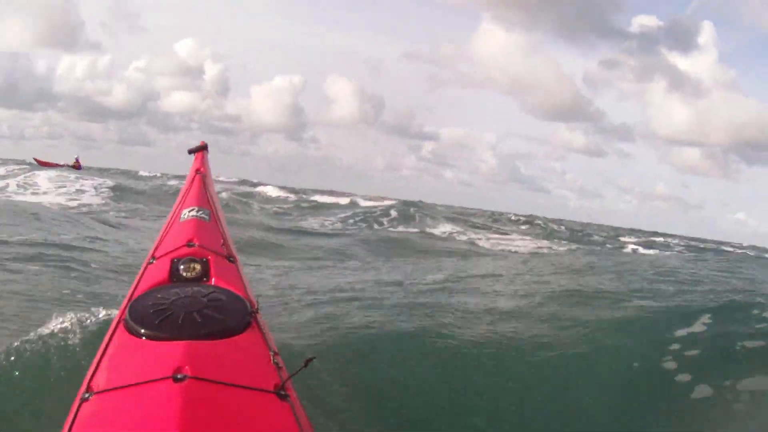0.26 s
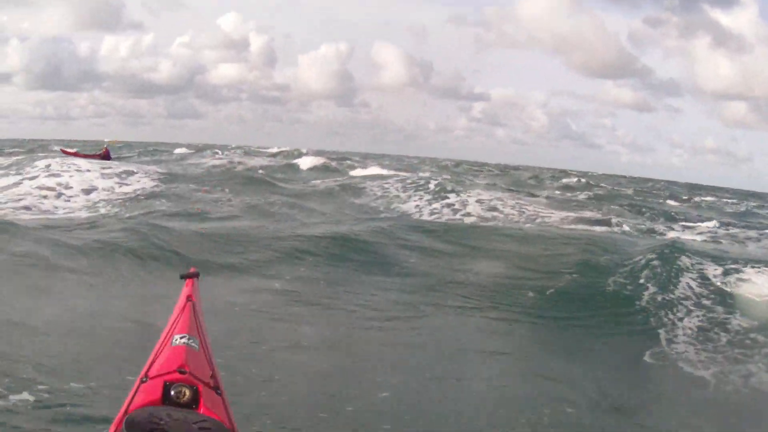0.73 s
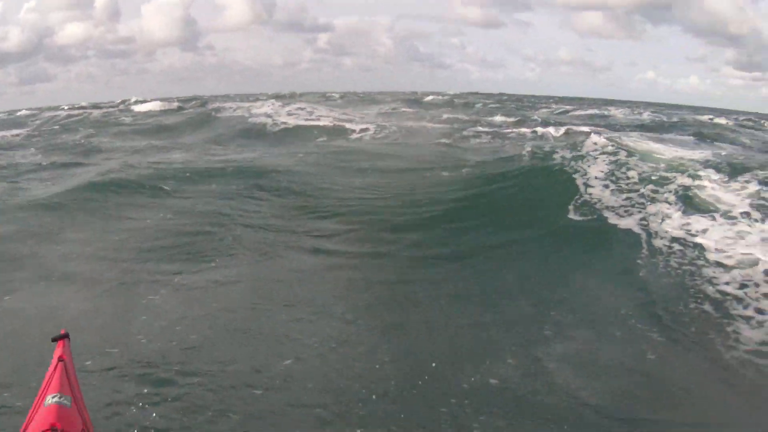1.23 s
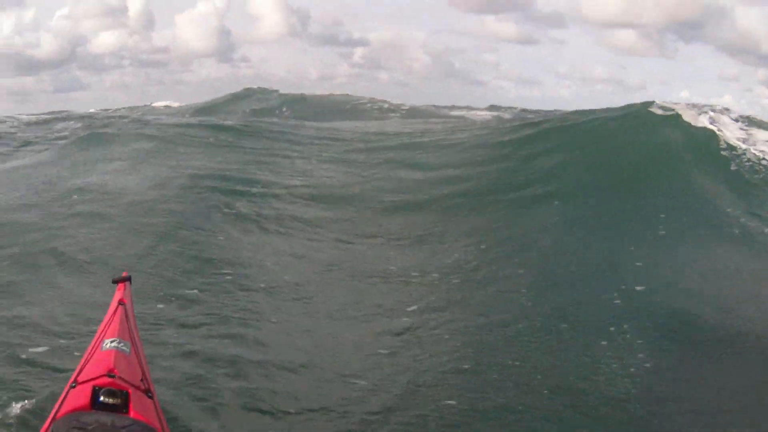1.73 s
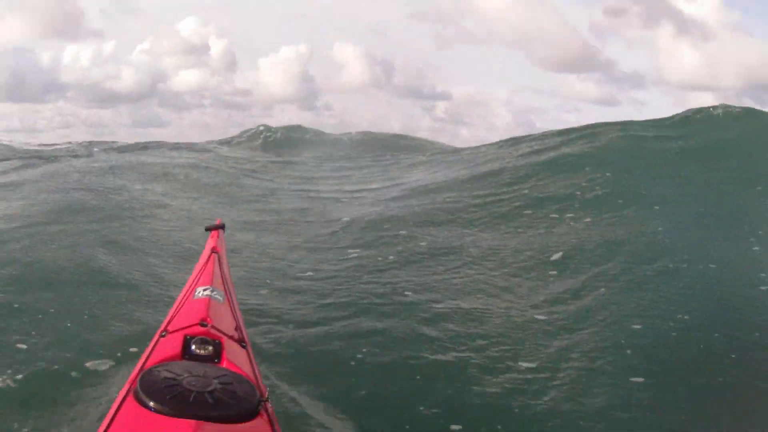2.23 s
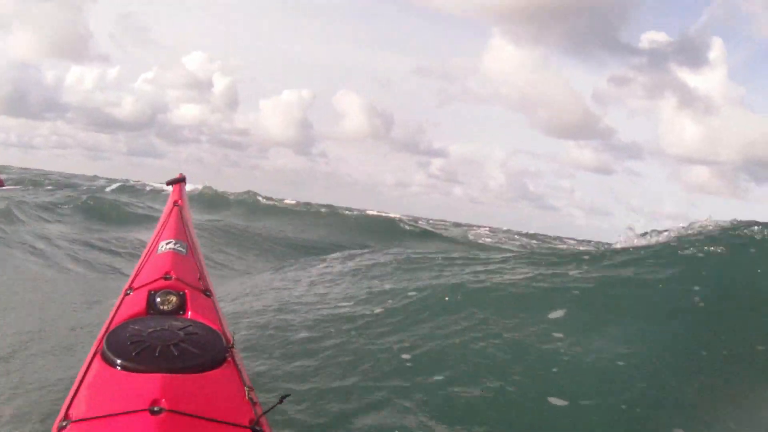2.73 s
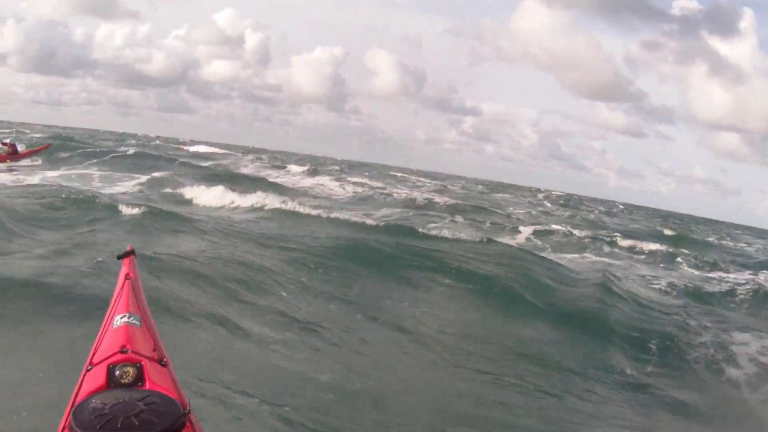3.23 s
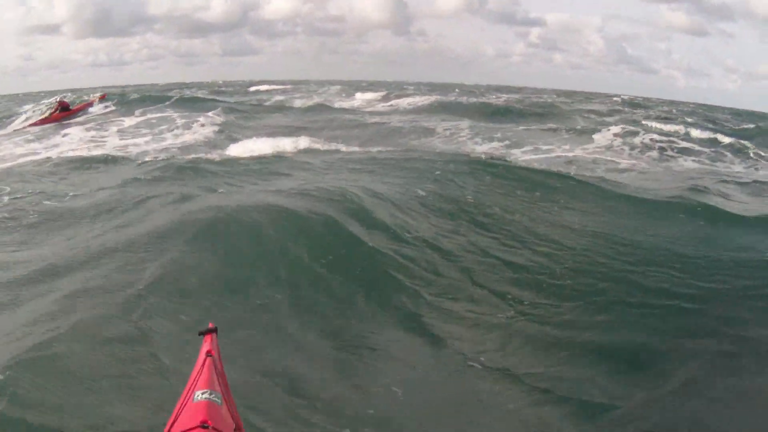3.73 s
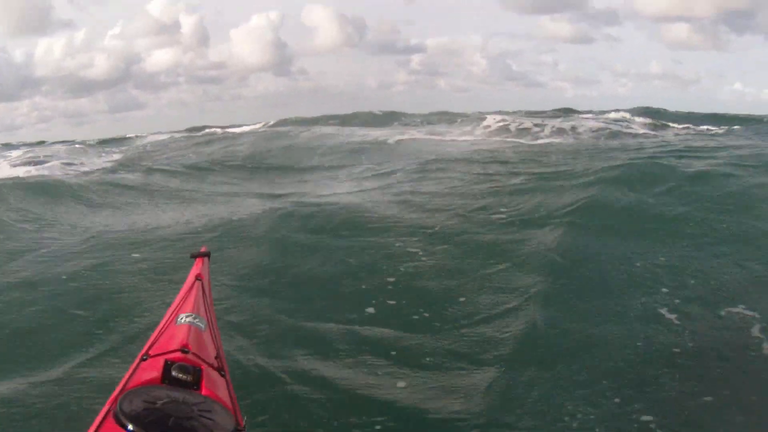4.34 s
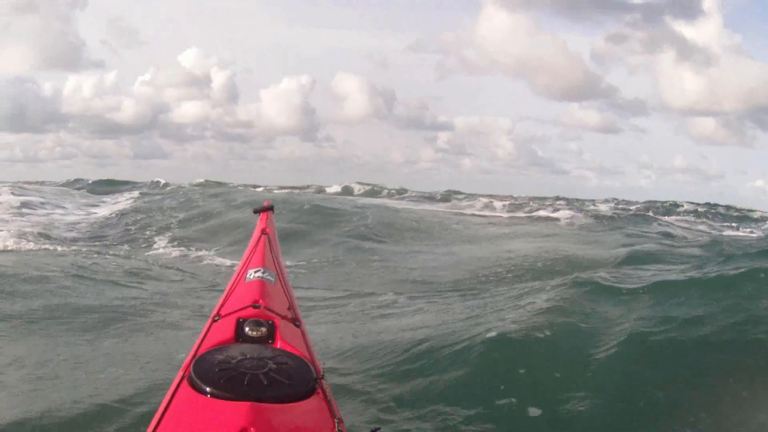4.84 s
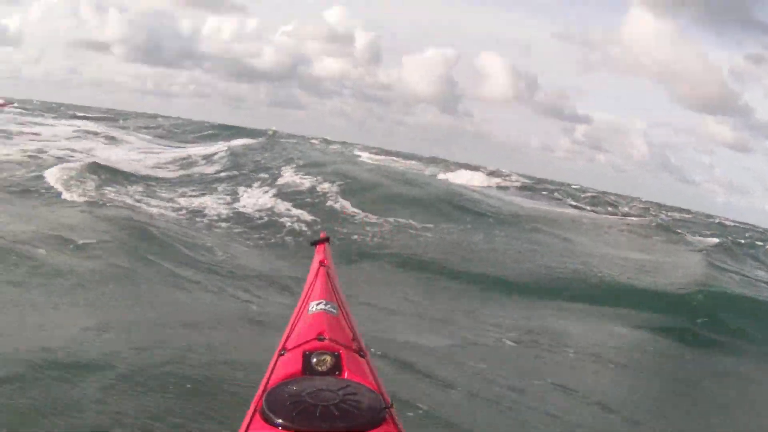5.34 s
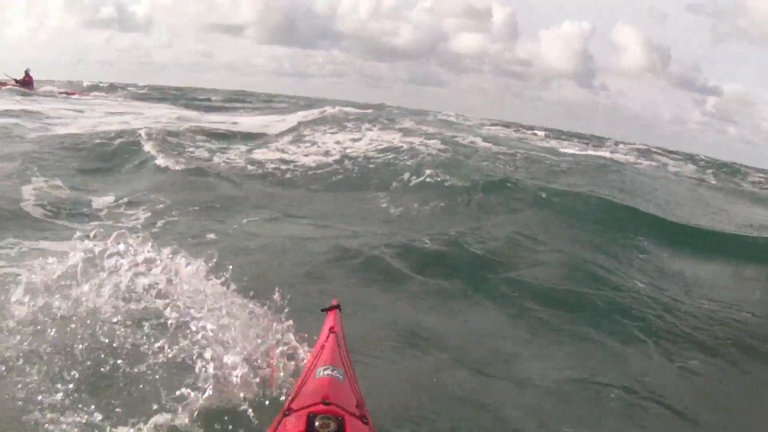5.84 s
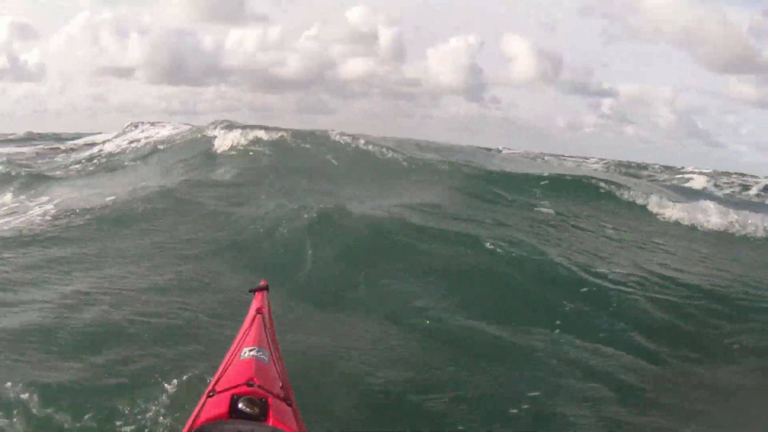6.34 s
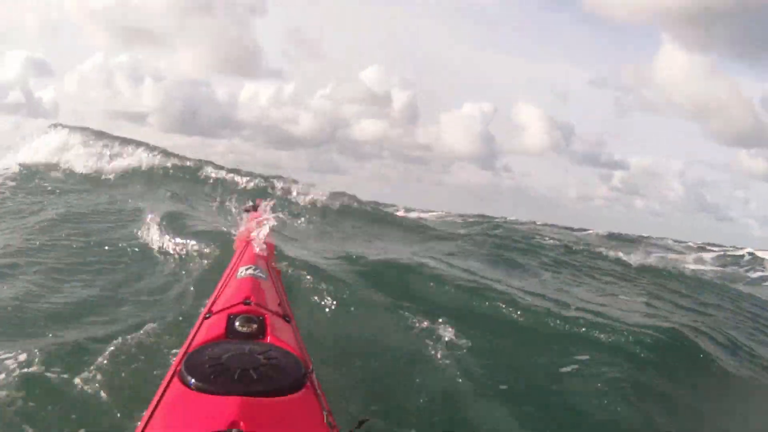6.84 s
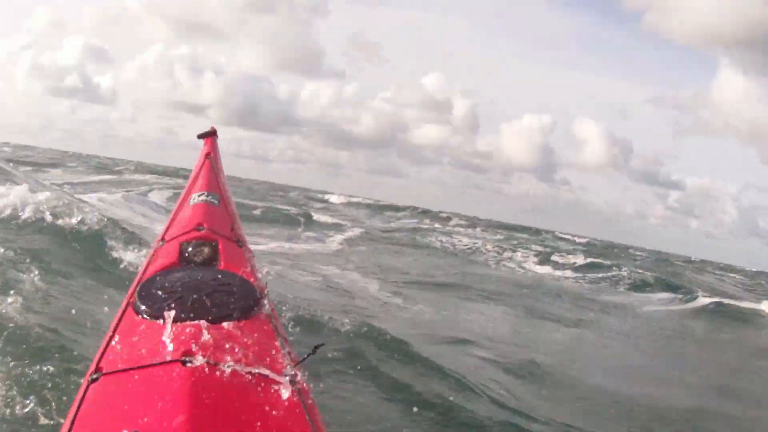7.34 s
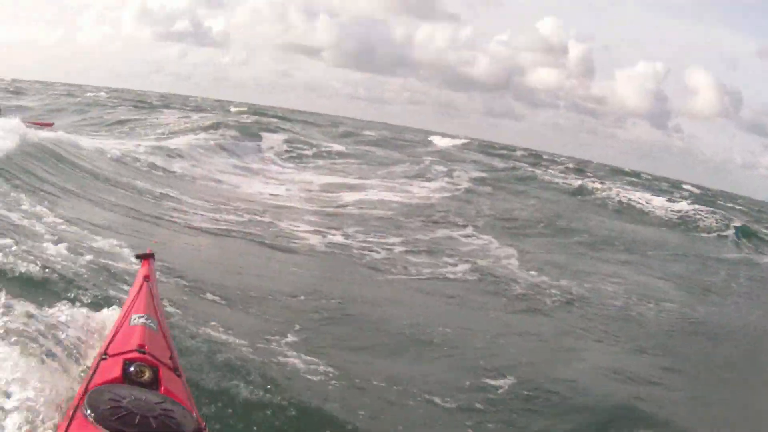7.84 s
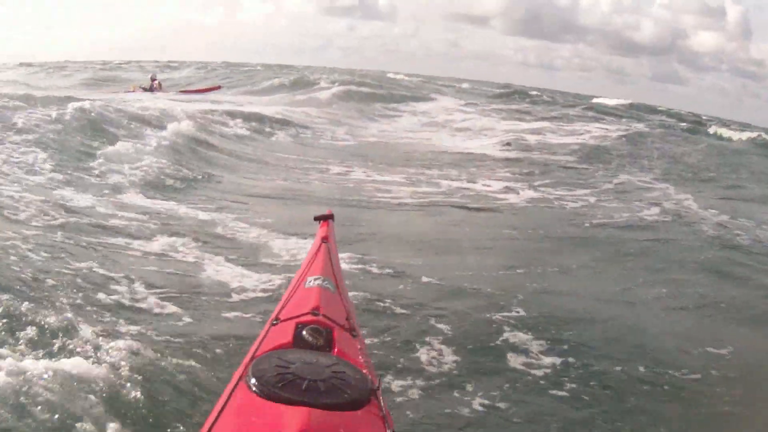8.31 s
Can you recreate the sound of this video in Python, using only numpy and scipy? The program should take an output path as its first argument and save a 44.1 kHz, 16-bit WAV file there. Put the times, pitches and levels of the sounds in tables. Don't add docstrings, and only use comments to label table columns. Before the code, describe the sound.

Outdoors on open rough water, a sealed microphone rides a small boat. Dull gusty wind rumbles and flutters throughout over bubbling hull wash. Small drops and sharp slaps strike the casing early, the water eases, then a dense splash crashes over it. After a calmer stretch, more spray arrives, then low gulping knocks, and the foam swells again with wind puffs at the end.

```python
import sys
import numpy as np
from scipy import signal
from scipy.fft import rfft, irfft, next_fast_len
from scipy.io import wavfile
from scipy.ndimage import uniform_filter1d, map_coordinates

SR = 44100
rng = np.random.default_rng(int(sys.argv[2]) if len(sys.argv) > 2 else 0)


def magnitude_from_level(level_db):
    exponent = np.asarray(level_db, float) / 20
    return 10 ** exponent


def wav_out(sig):
    wavfile.write(sys.argv[1], SR, np.round(np.clip(np.atleast_2d(sig).T, -1, 1) * 32767).astype(np.int16))


N = 377937


def unit(x):
    return x / np.sqrt(np.mean(x ** 2) + 1e-20)


def curves(rows):
    s, *columns = np.transpose(rows)
    return [np.interp(np.arange(N) / SR, s, column) for column in columns]


def swells(rows):
    t = np.arange(0, N / SR, .005)
    total_db = sum(db * np.exp(-((t - s) / width) ** 2) for s, db, width in rows)
    return np.interp(np.arange(N) / SR, t, total_db)


def wobble(rate):
    knots = rng.standard_normal(int(N * rate / SR) + 4)
    return map_coordinates(knots, [np.arange(N) * rate / SR])


def bursts(rows):
    env, t = np.zeros(N + SR), np.arange(SR // 3) / SR
    for s, db, rise, t60 in rows:
        env[round(s * SR):][:len(t)] += magnitude_from_level(db - 60 * t / max(t60, .002)) * (1 - np.exp(-t / rise))
    return env[:N]


def halves(x, hz):
    filters = [signal.butter(4, hz, kind, fs=SR, output="sos") for kind in ("low", "high")]
    return [signal.sosfilt(sos, x) for sos in filters]


def coloured(x, points):
    m = 2 * next_fast_len(N // 2 + 4096)
    hz, db = np.transpose(points)
    gain_db = np.interp(np.log(np.fft.rfftfreq(m, 1 / SR) + 1), np.log(hz + 1), db)
    cepstrum = irfft(np.log(magnitude_from_level(gain_db) + 1e-6), m)
    cepstrum[1:m // 2] *= 2
    cepstrum[m // 2 + 1:] = 0
    return irfft(rfft(x, m) * np.exp(rfft(cepstrum)), m)[..., :N]


def patchy(depth_db, bins, frames):
    z = signal.stft(rng.standard_normal(N), nperseg=256)[2]
    field = uniform_filter1d(rng.standard_normal(z.shape), bins, 0)
    field = uniform_filter1d(field, frames, 1)
    return unit(signal.istft(z * magnitude_from_level(depth_db * unit(field)), nperseg=256)[1][:N])


def bubbles(count, lo_hz, hi_hz, cycles, spread_db, size):
    when, pitch = rng.random((2, count, 1))
    hz, t = lo_hz * (hi_hz / lo_hz) ** pitch, np.arange(size) / SR
    age = t * hz / cycles
    bigness = np.minimum(rng.exponential(size=(count, 1)), 3.5)
    swell = magnitude_from_level(spread_db * bigness) * np.sqrt(hz) * age * np.exp(-3 * age)
    pop = swell * np.sin(2 * np.pi * hz * t * (1 + 0.13 * age))
    at = (when * N).astype(int) + np.arange(size)
    return unit(np.bincount(at.ravel(), pop.ravel(), N + size)[:N])


# (f/Hz, level/dB per Hz)
BUFFET_SPECTRUM = [(12, -54), (20, -31), (38, -32), (75, -23), (139, -8.5), (244, 1), (280, -1.5), (444, 0),
                   (670, -19), (960, -24), (1200, -36.5), (1560, -54), (2640, -120)]
# (t/s, level/dB)
GUSTS = [(0, -24), (.6, -28.5), (.9, -25), (1.2, -21.5), (1.5, -18), (1.85, -22), (2.06, -22), (2.25, -26),
         (2.75, -29.5), (3.55, -25), (4.15, -22), (4.6, -24), (5.2, -27.5), (5.9, -25), (6.3, -28.5),
         (6.55, -20.5), (7.0, -31), (8.57, -34)]
# (t/s, gain/dB, extra gain of the big eddies/dB, half width/s)
PUFFS = [(.42, 1.5, 3.5, 0.037), (1.08, -1.5, 6, 0.15), (3.1, 0.5, 8.5, 0.15), (3.42, 1, 4, .04),
         (3.62, -6, -9, 0.05), (4.25, 2, 3, 0.11), (4.68, 1.5, 2, 0.092), (5.4, 2, 4, .05),
         (.05, -1, 0, 0.1), (1.75, 1, 1, .06), (6.68, 1.5, -3, 0.09), (7.47, 3.5, 2, 0.044),
         (5.7, -1.5, -7, 0.17), (7.68, 6, -13, 0.083), (8.02, 7, 3.5, 0.32), (8.48, 3.5, 12.5, 0.13)]
DEEP_DB, DEEP_FOLLOWS = -41, 1.86
BODY_HZ, BODY_GROWS = 330, .22


def wind():
    gust_db, = curves(GUSTS)
    gust_db = gust_db + swells([(s, db, width) for s, db, _, width in PUFFS])
    swing_db = gust_db - gust_db.mean()
    deep_db = DEEP_DB + DEEP_FOLLOWS * swing_db + 2.3 * wobble(15)
    deep_db = deep_db + swells([(s, db, width) for s, _, db, width in PUFFS])
    lumps = magnitude_from_level(0.2 * wobble(11) + 1.44 * wobble(40))

    deep, buffet = halves(coloured(patchy(1.1, bins=2, frames=12), BUFFET_SPECTRUM), hz=150)
    low, high = halves(buffet, BODY_HZ)
    buffet = 0.66 * (magnitude_from_level(BODY_GROWS * swing_db) * low + high) / high.std()
    sway, deep = halves(deep, hz=40)
    sway_db = -75 + 2.5 * wobble(3.4)
    return magnitude_from_level(gust_db - 0.99) * lumps * buffet + magnitude_from_level(deep_db) * unit(deep) + magnitude_from_level(sway_db) * unit(sway)


# (f/Hz, level/dB per Hz)
WALL_RESPONSE = [(240, -21), (400, -6), (438, 4), (476, -2.5), (879, -10.5), (1510, -11.5), (1780, -7),
                 (2010, 1), (2100, -2), (2650, -38.5), (2900, -39), (3770, -53), (6380, -120)]
# (t/s, gain/dB, half width/s)
SURGES = [(.22, 1.5, 0.23), (.62, -1, 0.15), (1.65, -2, 0.13), (2.15, 2, 0.27), (3.1, -3.5, 0.23),
          (4.55, 2, 0.12), (5.18, -1.5, .1), (5.6, 1.5, 0.32), (6.05, -1.5, 0.16), (6.8, 0, 0.16),
          (7.98, 2.5, 0.12), (8.4, 0.5, 0.26)]
# (t/s, level on the port/dB, level on the wall/dB, rise/s, t60/s)
SHEETS = [(.521, -30.5, -21, 0.0046, 0.11), (.7, -39, -26, 0.049, 0.35), (1.409, -33, -24, 0.023, 0.18),
          (3.237, -28.5, -20.5, 0.032, 0.47), (3.404, -31, -22.5, 0.0072, 0.33),
          (3.496, -27.5, -20.5, 0.012, 0.56), (3.614, -26.5, -13.5, 0.017, 0.17),
          (6.22, -29.5, -34, .05, 0.46), (7.451, -51, -44, .002, 0.045), (7.868, -35.5, -27, 0.0087, 0.42),
          (8.05, -72, -41, .04, 0.9), (8.26, -34, -26, 0.062, .42)]
WASH_DB, WASH_FOLLOWS = -32.5, 0.72


def wash(swing_db):
    level_db = WASH_DB + WASH_FOLLOWS * swing_db + swells(SURGES)
    foam = patchy(0.99, bins=4, frames=10) * magnitude_from_level(0.16 * wobble(16))
    froth = foam + 0.24 * bubbles(count=5000, lo_hz=508.4, hi_hz=2631, cycles=7.5, spread_db=3, size=500)
    sheets = bursts([(s, wall_db, rise, t60) for s, _, wall_db, rise, t60 in SHEETS])
    return (magnitude_from_level(level_db) + sheets) * unit(coloured(froth, WALL_RESPONSE))


# (f/Hz, level/dB per Hz)
PORT_RESPONSE = [(1470, -36), (2500, -6), (2720, -13), (3730, 2), (4260, -8), (4850, 3.5), (5580, -7),
                 (6560, 0), (7310, -8), (9070, -24.5), (10000, -21.5), (11600, -4), (13500, -10.5),
                 (15100, -0.5), (15800, -8)]
NOTCH_HZ = 9350


def through_port(x):
    both = coloured(np.array([x, rng.standard_normal(N)]), PORT_RESPONSE)
    return [heard / reference.std() for heard, reference in halves(both, NOTCH_HZ)]


# (t/s, gain/dB, half width/s)
VEILS = [
    (.36, -4, 0.32),
    (3.04, 5, .08),
    (3.3, -7, .06),
    (4.95, 1, .08),
    (5.8, 10, 0.088),
    (6.05, 2, 0.098),
    (7.25, 7.5, 0.34),
    (7.6, -1.5, .06),
]
# (t/s, peak level/dB, level above the notch re peak/dB)
DROPS = [(.1575, -40, -14), (.4165, -29, -20), (0.668, -21, -8), (.8924, -26, -25), (1.487, -22, -15),
         (1.5668, -32, -15), (1.789, -27, -20), (2.294, -27, -7), (2.4409, -39, -5), (2.5551, -38, 1),
         (2.705, -39, -6), (2.9148, -27, -16), (2.9357, -29, -15), (3.072, -23, -20), (3.414, -13, -22),
         (3.4989, -21, -12), (3.5114, -14, -24), (4.4308, -29, -22), (4.9177, -26, -14),
         (5.1834, -22.5, -10), (2.482, -34, -21), (5.3532, -36, -12), (5.461, -27, -21), (6.2302, -22, -8),
         (6.9157, -34, -23), (7.5472, -38, -18), (7.6445, -24, -8), (7.655, -23, -19), (7.748, -21, -23),
         (7.88, -27, -8)]
# (t/s, peak level/dB, level above the notch re peak/dB, t60/s)
FLURRIES = [(3.26, -37.5, -7, 0.25), (3.497, -37, -7, 0.31), (6.2, -42, -6, 0.37), (4.9, -41, -15, 0.24),
            (7.657, -29.5, -20, .02), (5.135, -39, -3, 0.13), (5.295, -17.5, -8, .012),
            (5.301, -53, 0, 0.099), (5.445, -38, -20, 0.23), (5.508, -32, -14, 0.011),
            (5.56, -42, -5, 0.01), (5.394, -38, -25, .015)]
MIST_DB, MIST_FOLLOWS = -56.5, 1.2
DROP_RISE_S, DROP_T60_S = 0.001, 0.012
FLURRY_RISE = 0.042
SHEET_TOP_DB = -13


def spray(foam_db, swing_db):
    mist_db = MIST_DB + MIST_FOLLOWS * swing_db + swells(VEILS)
    hiss = patchy(0.73, bins=12, frames=8)
    crackle = bubbles(count=9000, lo_hz=2736, hi_hz=15450, cycles=7, spread_db=2, size=200)
    ticks = bubbles(count=300, lo_hz=3480, hi_hz=6980, cycles=10, spread_db=3, size=160)
    ticks = ticks + 0.79 * bubbles(count=150, lo_hz=11000, hi_hz=15000, cycles=2.2, spread_db=1.5, size=30)
    flicker = magnitude_from_level(0.34 * wobble(10) + 0.23 * wobble(49))
    body, mist = through_port(unit((hiss + .5 * crackle + 0.2 * ticks) * flicker))

    thrown = [(s, db - 5, top_db, DROP_RISE_S, DROP_T60_S) for s, db, top_db in DROPS]
    thrown += [(s, db, SHEET_TOP_DB, rise, t60) for s, db, _, rise, t60 in SHEETS]
    thrown += [(s, db, top_db, FLURRY_RISE * t60, t60) for s, db, top_db, t60 in FLURRIES]
    body_env = bursts([(s, db - 5, rise, t60) for s, db, _, rise, t60 in thrown])
    top_env = bursts([(s, db + top_db, rise, t60) for s, db, top_db, rise, t60 in thrown])
    hit = unit(hiss + 0.28 * crackle)
    bright = 1.42 * signal.lfilter([1, -.7], 1, hit)
    hit_body, _ = through_port(bright * body_env)
    _, hit_top = through_port(hit * top_env)
    return magnitude_from_level(foam_db - 0.6) * body + magnitude_from_level(mist_db) * mist + hit_body + hit_top


# (t/s, peak level/dB, start f/Hz, rise as share of f, life/s)
GULPS = [(.443, -20, 520, .2, .012), (.527, -19, 1000, .2, .008), (.102, -24, 1450, .2, .008),
         (1.422, -19, 1150, .3, .009), (1.428, -24, 1600, .2, .006), (7.308, -24, 450, .05, .02),
         (7.336, -21, 400, 1.3, .046), (7.414, -25, 1330, .02, .014), (7.454, -23, 1100, .1, .008),
         (7.453, -26, 1550, .1, .006), (7.457, -15, 240, .1, .016), (7.458, -33, 90, .05, .03),
         (7.473, -15, 300, .05, .014), (7.49, -20, 330, .1, .022), (7.518, -21, 240, .1, .016)]
GULP_ROUGH, GULP_SPLASH_DB = .2, -9


def gulps():
    ring = np.zeros(N + SR)
    for s, db, hz, rise, life in GULPS:
        age = np.arange(int(life * SR)) / (life * SR)
        cycles = hz * life * (age + rise * age ** 3 / 3)
        ring[round(s * SR):][:len(age)] += magnitude_from_level(db) * np.sin(np.pi * age ** .65) * np.sin(2 * np.pi * cycles)
    flutter = 1 - GULP_ROUGH / 2 + GULP_ROUGH * wobble(700)
    water = rng.standard_normal(N)
    for _ in range(2):
        water, _ = halves(water, hz=1900)
    _, water = halves(water, hz=480)
    splash = bursts([(s, db + GULP_SPLASH_DB, .002, 3 * life) for s, db, _, _, life in GULPS])
    return ring[:N] * flutter + splash * unit(water)


# (t/s, peak level/dB)
SLAPS = [(0.1917, -11.5), (.5227, -21), (.752, -12), (.628, -11), (.6664, -17), (.6898, -9), (1.8138, -22),
         (1.837, -38), (2.4613, -22), (2.5436, -23), (2.8694, -18), (3.027, -17), (3.1961, -21),
         (3.277, -12), (3.3413, -12), (3.3648, -8), (3.4172, 10), (3.6461, -6), (3.653, -6), (4.8574, -15),
         (5.4954, -13.5), (5.874, -23), (6.2775, -14), (6.3709, -7.5), (7.0579, -13), (7.1322, -7),
         (7.1706, -14), (8.0311, -20), (8.0631, -9), (8.3429, -15)]
RING_HZ, RING_SCATTER = 2033, 0.0067
RING_S, WET_DAMPING = 0.015, 0.34


def slaps():
    out, t = np.zeros(N + SR), np.arange(SR // 20) / SR
    for s, db in SLAPS:
        hz = RING_HZ * (1 + RING_SCATTER * rng.standard_normal())
        t60 = RING_S * magnitude_from_level(-WET_DAMPING * (db + 21.5))
        env = magnitude_from_level(db + 12.5 - 60 * t / t60) * (1 - np.exp(-t / 0.0015)) ** 2
        out[round(s * SR):][:len(t)] += env * np.sin(2 * np.pi * hz * t)
    out = out[:N]
    for _ in range(2):
        out, _ = halves(out, hz=2370)
    return out


# (t/s, level/dB)
SEA = [(0.0, -49.5), (0.36, -49.5), (0.6, -47.5), (1.38, -48), (1.53, -50.5), (1.79, -55), (2.74, -55),
       (3.03, -49.5), (3.22, -41.5), (3.46, -48.5), (3.7, -51), (4.15, -51.5), (5.78, -54), (6.3, -45.5),
       (6.63, -53), (7.73, -47.5), (7.95, -45), (8.57, -44.5)]


def scene():
    foam_db, = curves(SEA)
    swing_db = foam_db - foam_db.mean()
    water = wash(swing_db) + spray(foam_db, swing_db) + gulps() + slaps()
    return (wind() + water)[None]


def band_limit(x):
    return signal.sosfilt(signal.butter(12, 15830, fs=SR, output="sos"), x)


def record(dry):
    return band_limit(dry)


dry = scene()
out = record(dry)
wav_out(out)
```